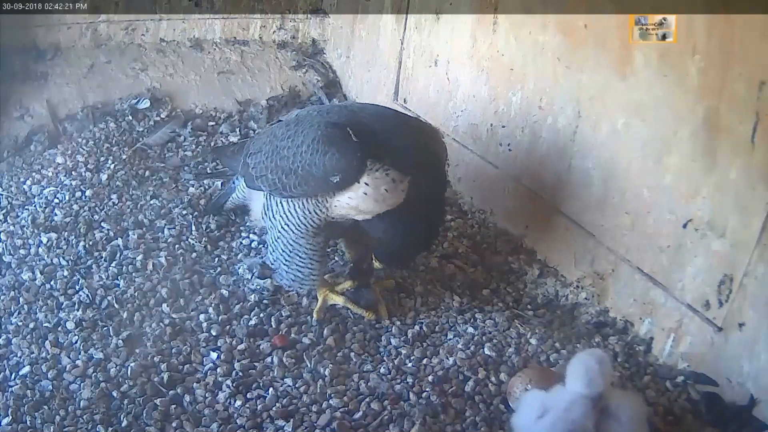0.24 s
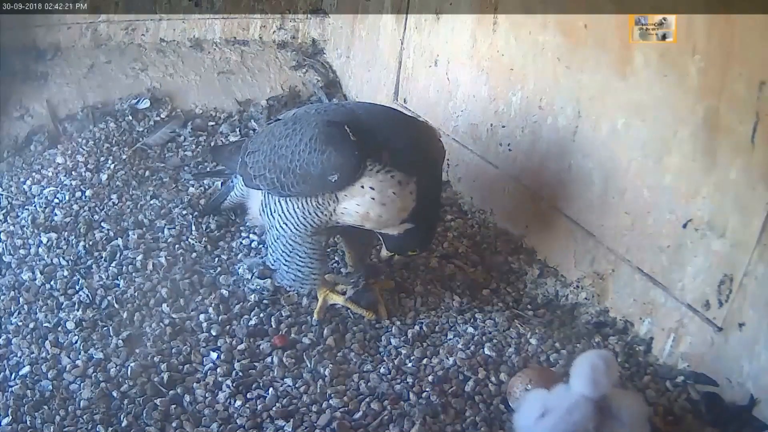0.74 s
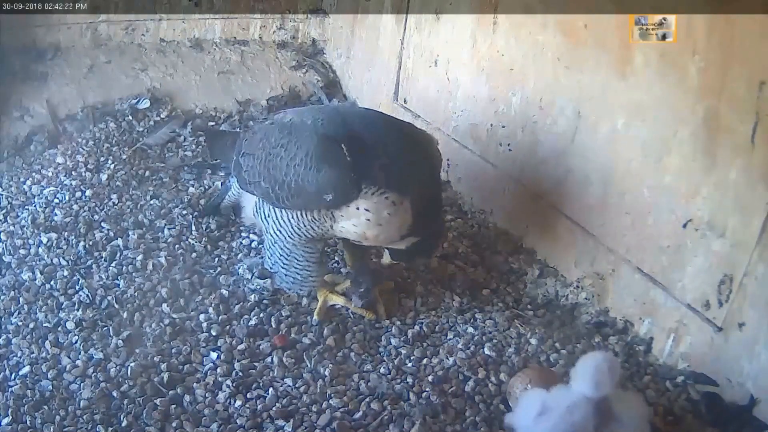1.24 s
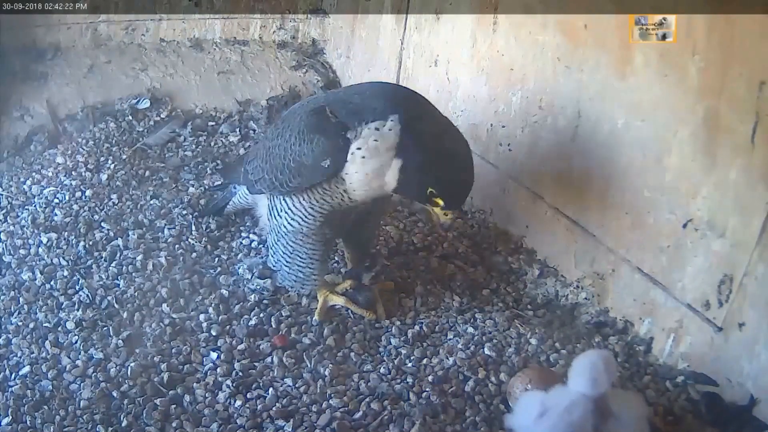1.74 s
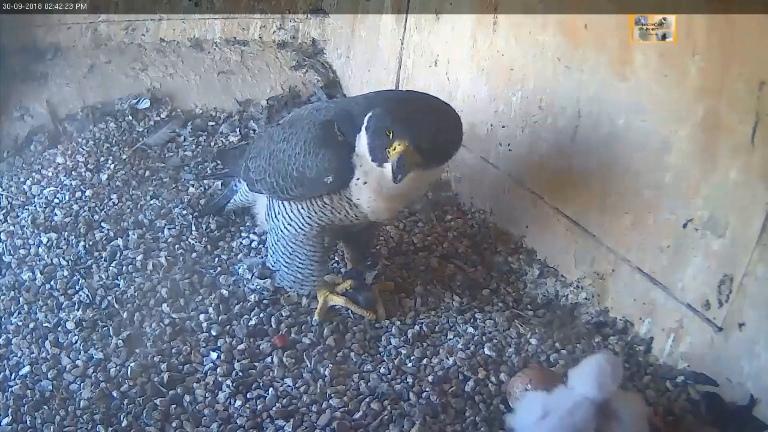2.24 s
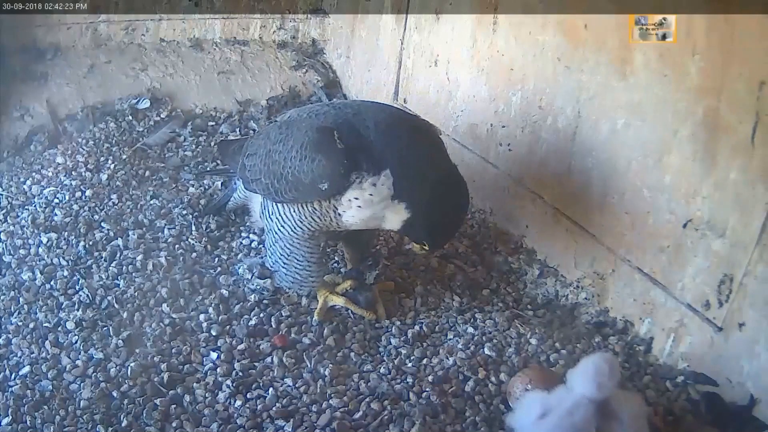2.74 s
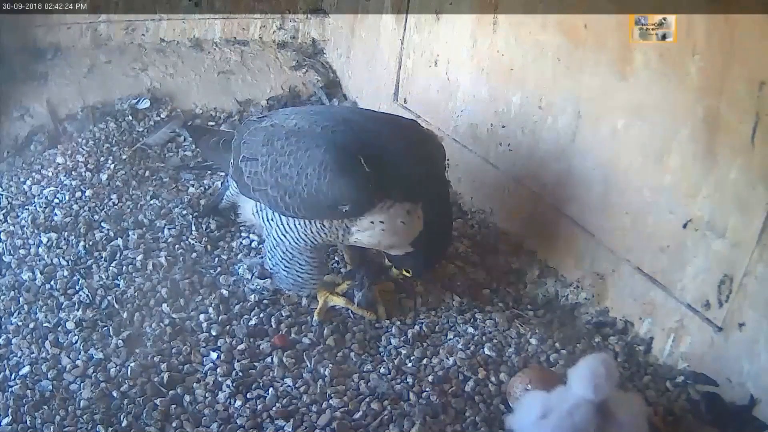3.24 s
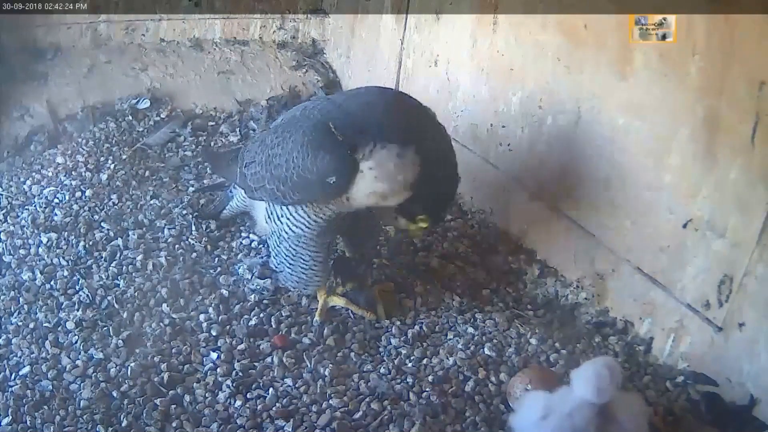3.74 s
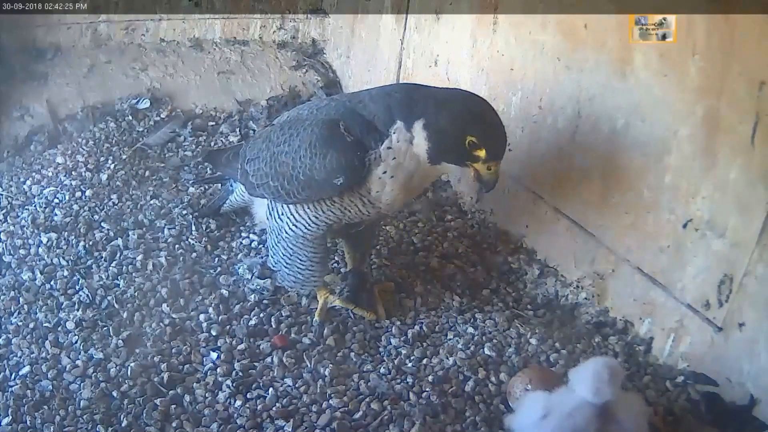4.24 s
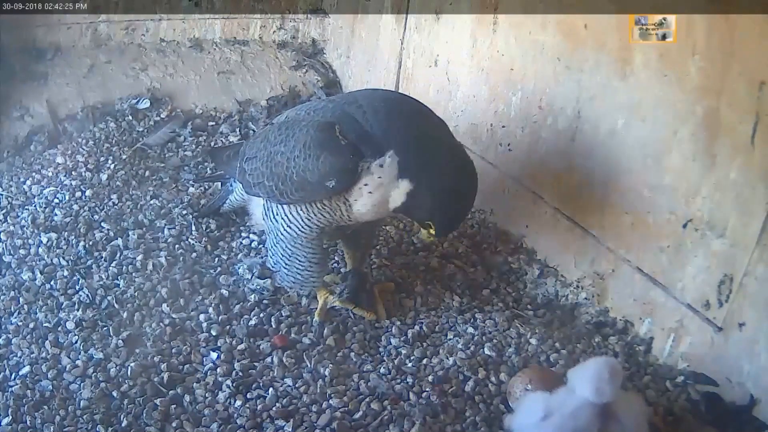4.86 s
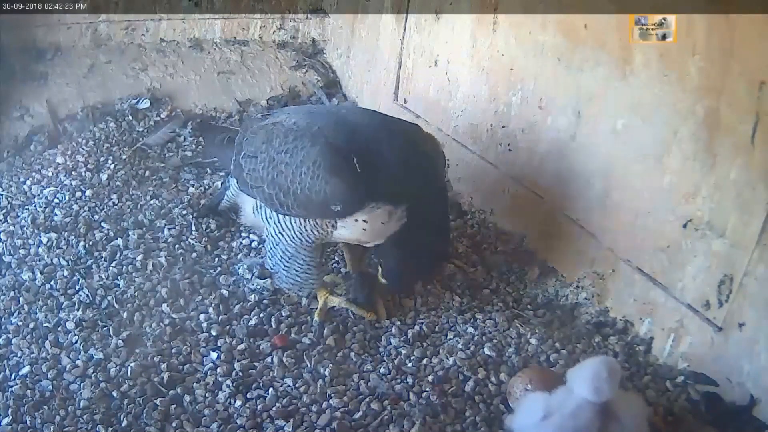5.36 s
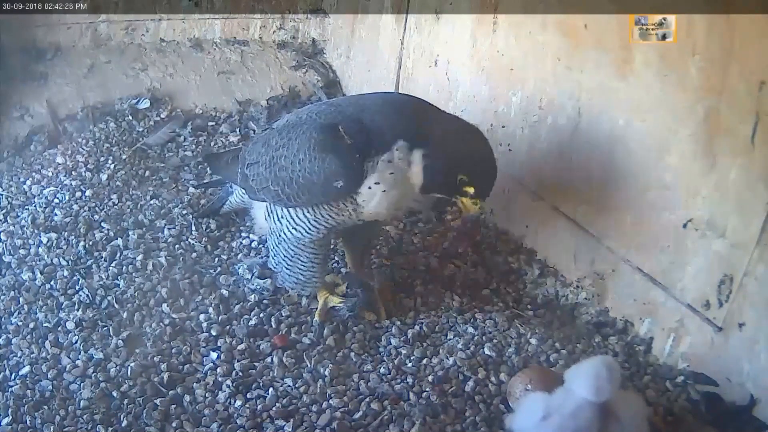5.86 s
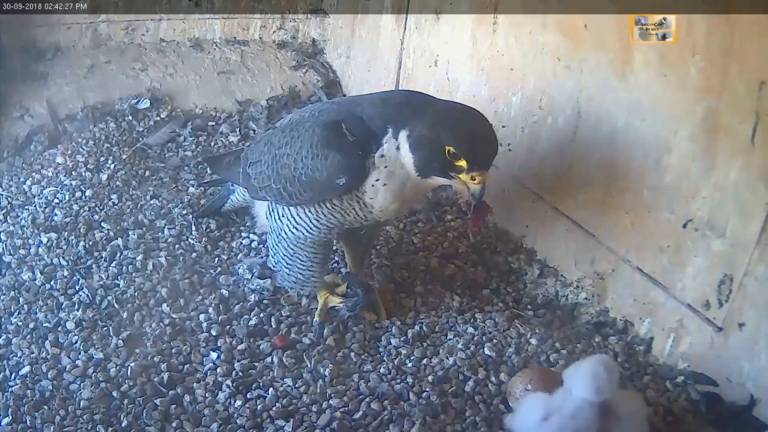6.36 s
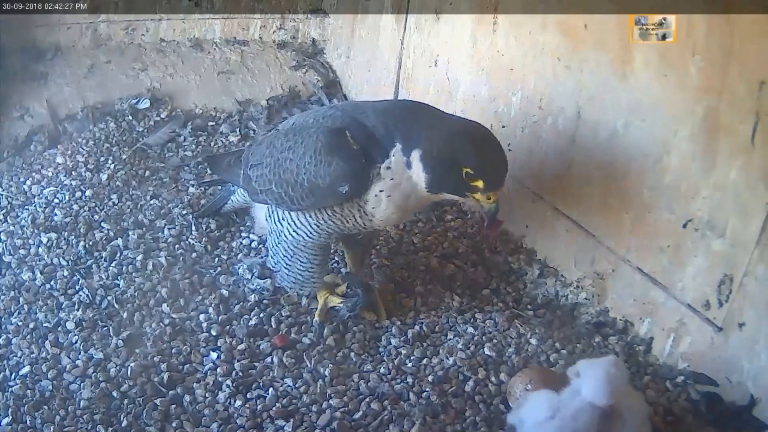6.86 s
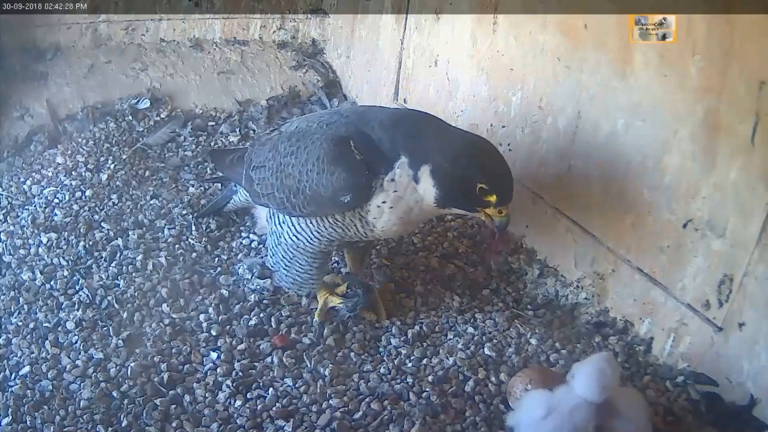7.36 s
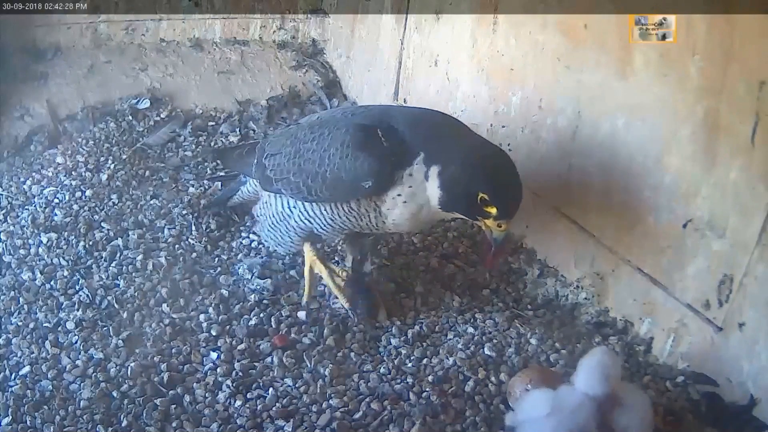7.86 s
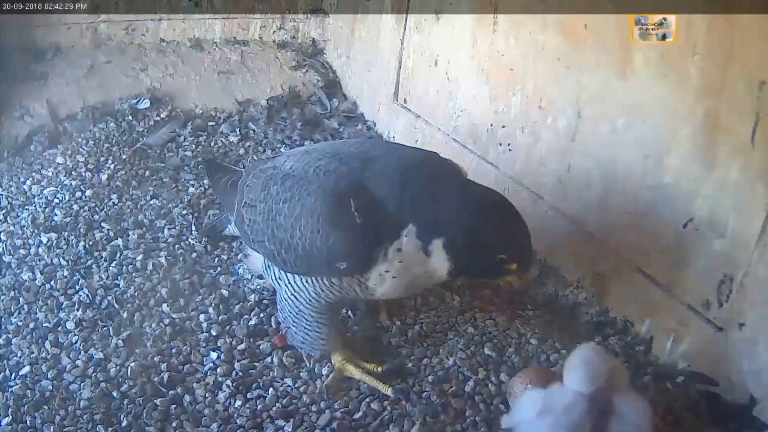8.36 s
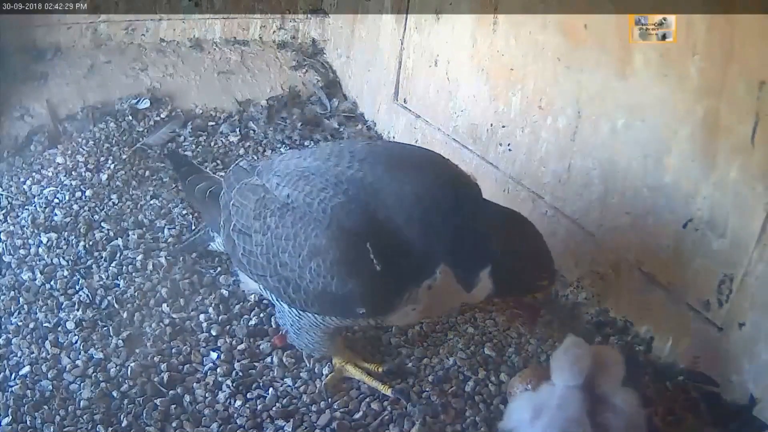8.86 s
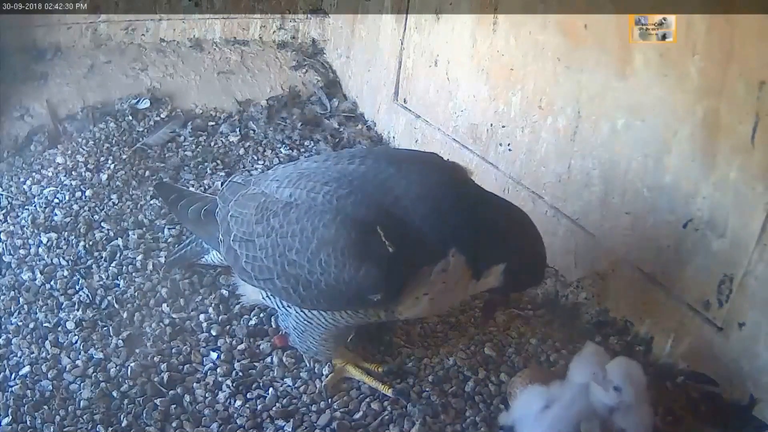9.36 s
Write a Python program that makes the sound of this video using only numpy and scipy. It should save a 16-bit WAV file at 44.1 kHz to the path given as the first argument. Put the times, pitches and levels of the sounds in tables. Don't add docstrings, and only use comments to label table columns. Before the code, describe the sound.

High, short chick peeps and hoarse squeals run throughout, over low wind rumble and gravel ticks, with three sharp, rattling parent clucks late on.

```python
import sys
import numpy as np
from scipy import signal
from scipy.fft import rfft, irfft
from scipy.io import wavfile
from scipy.ndimage import uniform_filter1d

SR = 44100
rng = np.random.default_rng(int(sys.argv[2]) if len(sys.argv) > 2 else 0)


def volts_from_decibels(level):
    exponent = np.asarray(level, float) / 20
    return 10 ** exponent


def materialize(psi):
    bounded = np.clip(np.atleast_2d(psi).T, -1, 1)
    quanta = np.round(bounded * 32767).astype(np.int16)
    wavfile.write(sys.argv[1], SR, quanta)


N = 423360
T = np.arange(N) / SR
TOP_HZ = 7500


def colour(x, points):
    hz, db = np.transpose(points)
    log_hz = np.log(np.arange(len(x) // 2 + 1) * SR / len(x) + 1)
    curve_db = np.interp(log_hz, np.log(hz), db, db[0] - 29.5, db[-1] - 38.5)
    return irfft(rfft(x) * volts_from_decibels(curve_db), len(x))


def ring(x, hz, width_hz):
    return signal.lfilter(*signal.iirpeak(hz, hz / width_hz, fs=SR), x)


def unit(x):
    return x / np.sqrt(np.mean(x ** 2))


def walk(rate_hz):
    k = max(int(SR / rate_hz), 1)
    once = uniform_filter1d(rng.standard_normal(N), k)
    return unit(uniform_filter1d(once, k))


def span(table):
    s, *columns = np.transpose(table)
    at = slice(int(s[0] * SR), int(s[-1] * SR))
    return at, [uniform_filter1d(np.interp(T[at], s, c), size=131) for c in columns]


def end_fades(n):
    i = np.arange(n)
    return np.clip(np.minimum(i, i[::-1]) / 88, 0, 1)


def knee(x, width):
    return width * np.logaddexp(0, x / width)


# (frequency [Hz], level [dB])
THROAT_RASP = [(1100, -18), (1700, -1), (2300, -22.5), (3000, -3), (4300, -7), (5600, -2.5), (6900, -10.5)]


def tone(table, wobble, overtones_db):
    at, (hz, db) = span(table)
    wobbling_hz = hz * (1 + wobble[at] * np.minimum(hz / 3000, 1) ** 2)
    phase = 2 * np.pi * np.cumsum(wobbling_hz) / SR
    wave = np.sin(phase)
    for partial, over_db in enumerate(overtones_db, 2):
        over_db = over_db + np.interp(partial * hz, *np.transpose(THROAT_RASP))
        wave = wave + volts_from_decibels(over_db) * (partial * hz < TOP_HZ) * np.sin(partial * phase)
    loud = volts_from_decibels(db) * end_fades(len(hz))
    return at, np.sqrt(2) * loud * wave, loud, hz


# (frequency [Hz], level [dB])
BEAK_COLOUR = [(1400, -0.5), (1800, 3.5), (2350, -7), (3000, 2), (3700, 0), (4600, -7), (5300, -3),
               (5900, 4)]
MID_HZ, BEND_HZ = 3000, 200


def cheep(s, rise_s, mid_s, top_hz, end_hz, hold_s, db, upper_db, stop_s, droop_hz, droop_s,
          perch_hz, perch_db, swell_s, fall_hz_s, settle_hz, fade_db_s, tail_s):
    from_hz = 3700 - 20000 * rise_s
    ease = max(2.1 - 27 * rise_s, .5)

    def to_climb(t):
        return np.clip(1 - t / rise_s, 0, 1) ** ease

    def track(t, hz, shape_db):
        attack_db = -6.5 * np.clip(1 - t / .0093, 0, 1)
        beak_db = np.interp(hz, *np.transpose(BEAK_COLOUR))
        return np.transpose([s + t, hz, db + shape_db + beak_db + attack_db])

    t = np.linspace(0, mid_s - stop_s, num=48)
    late = np.clip(1 - (t[-1] - t) / droop_s, 0, 1) ** 2
    arch_hz = top_hz - (top_hz - from_hz) * to_climb(t)
    upper = track(t, arch_hz - droop_hz * late, upper_db)

    t = np.linspace(0, mid_s + hold_s + tail_s, num=96)
    rest_hz = end_hz + settle_hz * np.exp(-np.maximum(t - mid_s, 0) / .018)
    slide_hz = rest_hz + knee(MID_HZ - rest_hz - fall_hz_s * (t - mid_s), BEND_HZ)
    climb_hz = perch_hz - (perch_hz - from_hz) * to_climb(t)
    swell_db = perch_db * np.clip((mid_s - t) / swell_s, 0, 1) ** 2
    fade_db = fade_db_s * np.maximum(t - mid_s - hold_s, 0)
    lower = track(t, climb_hz - knee(climb_hz - slide_hz, BEND_HZ), swell_db - fade_db)
    return upper, lower


# (time [s], rise [s], time to mid pitch of the fall [s], arch top [Hz], level [dB])
CLEAR_PEEPS = [(0.13, 0.029, .059, 5876, -35.5), (0.509, 0.031, 0.061, 5980, -32.5),
               (0.982, 0.023, 0.048, 5980, -33.5), (1.562, 0.011, 0.047, 5300, -35),
               (2.131, 0.023, 0.049, 5900, -34.5), (2.581, 0.045, 0.078, 5700, -36),
               (3.05, 0.021, 0.047, 5770, -34.5), (3.617, 0.017, 0.047, 5270, -34),
               (4.056, .014, 0.04, 5535, -36), (4.707, 0.03, 0.046, 5320, -37.5),
               (5.574, 0.025, .05, 4330, -38), (6.183, 0.021, 0.054, 5180, -35.5),
               (7.509, 0.046, 0.073, 5900, -45.5), (7.928, 0.029, 0.058, 6110, -42),
               (8.365, 0.018, 0.043, 5900, -42.5), (8.816, .026, 0.051, 5900, -37),
               (9.358, 0.029, .074, 6050, -36.5)]
# (time [s], time to mid pitch of the fall [s], last pitch [Hz], hold [s], level [dB])
QUICK_RISERS = [(0.818, 0.052, 1450, 0.039, -32.5), (2.887, 0.079, 1800, 0.029, -32.5),
                (3.967, 0.054, 1566, 0.022, -28.5), (4.584, 0.06, 1512, 0.034, -30.5),
                (5.172, 0.06, 1430, .045, -31), (8.745, 0.061, 1500, 0.032, -39.5),
                (9.441, .039, 1450, 0.042, -37.5)]
SLOW_RISERS = [(3.385, 0.079, 1660, 0.035, -30.5), (6.743, 0.076, 1640, 0.027, -44),
               (7.183, .108, 1730, 0.042, -42.5), (7.685, .092, 1533, 0.029, -40),
               (8.145, .077, 1450, 0.026, -39.5)]
# (time [s], pitch [Hz], level [dB])
STRAY_VOICES = [
    [(2.992, 1850, -41), (3.027, 3520, -39), (3.045, 3670, -36), (3.075, 2560, -42), (3.085, 1930, -37.5)],
    [(4.064, 1590, -32.5), (4.095, 2110, -46)],
    [(7.21, 2455, -54), (7.23, 3530, -41.5), (7.25, 4900, -74)],
    [(7.335, 2200, -48.5), (7.352, 2910, -54)],
    [(8.848, 1540, -40), (8.867, 1877, -48)],
    [(8.876, 1738, -48), (8.884, 1450, -40), (8.912, 1402, -77)],
    [(9.436, 1800, -33.5), (9.445, 1485, -32), (9.468, 1450, -49)],
]
LOWER_OVERTONES = [-5, -12, -13.5]
PEEP = dict(upper_db=-4, stop_s=.012, droop_hz=1000, droop_s=.016, perch_hz=4050, perch_db=-10,
            swell_s=.015, fall_hz_s=80000, settle_hz=60, fade_db_s=1050, tail_s=.024)
SQUEAL = dict(upper_db=-8.5, stop_s=.0066, droop_hz=800, droop_s=.018, perch_hz=4400, perch_db=-18,
              swell_s=.018, fall_hz_s=92400, settle_hz=472, fade_db_s=1094.5, tail_s=.036)


def chicks():
    out, shake, flutter = np.zeros(N), walk(640), walk(600)
    rasp = unit(colour(rng.standard_normal(N), THROAT_RASP)) * volts_from_decibels(1.4 * walk(200))

    cheeps = []
    for s, rise_s, mid_s, top_hz, db in CLEAR_PEEPS:
        hoarse = np.clip(.07 + .0015 * (5900 - top_hz), .07, .22)
        upper, lower = cheep(s, rise_s, mid_s, top_hz, 1800, .0033, db, **PEEP)
        cheeps.append((upper, lower, hoarse))
    for rise_s, rows in [(.02, QUICK_RISERS), (.043, SLOW_RISERS)]:
        for s, mid_s, end_hz, hold_s, db in rows:
            upper, lower = cheep(s, rise_s, mid_s, 5580, end_hz, hold_s, db, **SQUEAL)
            cheeps.append((upper, lower, .57))

    for upper, _, hoarse in cheeps:
        at, wave, loud, hz = tone(upper, .057 * hoarse * shake, [-16.])
        strain = hoarse * np.clip((hz - 4200) / 900, .15, 1)
        out[at] += wave * volts_from_decibels(5 * strain * flutter[at])
        out[at] += 1.7 * strain * loud * rasp[at]
    for lower in [c[1] for c in cheeps] + list(STRAY_VOICES):
        at, wave, loud, hz = tone(lower, .028 * shake[::-1], LOWER_OVERTONES)
        strain = np.minimum(hz / MID_HZ, 1) ** 2
        out[at] += wave * volts_from_decibels(3.98 * strain * flutter[::-1][at])
        out[at] += .23 * strain * loud * rasp[at]
    return out


# (time [s], pulse rate [Hz], level [dB])
CLUCK_PULSES = [
    [(6.344, 355, -22.5), (6.349, 369.4, -14), (6.366, 378.8, -21.5), (6.385, 394, -27),
     (6.415, 391, -49.5)],
    [(6.555, 370, -38), (6.565, 370, -44), (6.6, 380, -35)],
    [(6.603, 399.3, -22), (6.624, 393, -19), (6.634, 373, -22.5), (6.65, 338.6, -32.5), (6.672, 327, -49.5)],
    [(7.353, 344, -29), (7.362, 362, -15.5), (7.372, 371, -23), (7.385, 421, -25), (7.41, 384, -50.5)],
]
# (frequency [Hz], width [Hz], level [dB])
THROAT_MODES = [(919, 77, -10.5), (1450, 140, -4), (1850, 83, -2.5), (2120, 68, -6), (3000, 410, -7.5),
                (4940, 480, -25.5), (5700, 350, -13.5), (6640, 890, -18), (7400, 170, -29)]
# (time [s], pitch [Hz], level [dB])
CLUCK_WHISTLES = [
    [(6.386, 3140, -42), (6.397, 3000, -20.5), (6.403, 3000, -33)],
    [(6.558, 3990, -34), (6.568, 4100, -25), (6.59, 4560, -20.5), (6.599, 4690, -13.5),
     (6.605, 4400, -22.5)],
    [(6.603, 3000, -10), (6.606, 2950, -1), (6.613, 2760, -4), (6.617, 2900, -18), (6.623, 2930, -9),
     (6.627, 2900, -22)],
    [(6.613, 2050, -16), (6.62, 1920, -15), (6.628, 1850, -24), (6.645, 1560, -27), (6.665, 1400, -40)],
    [(6.557, 2020, -33), (6.563, 2180, -28), (6.585, 2280, -40.5)],
    [(7.386, 3350, -33), (7.394, 3320, -9.5), (7.402, 3080, -20), (7.408, 3110, -10), (7.413, 2820, -24),
     (7.424, 3140, -31)],
]


def parent():
    pulses, whistles, shake = np.zeros(N), np.zeros(N), walk(380)
    puff_cycles = .014
    for table in CLUCK_PULSES:
        at, (hz, db) = span(table)
        turns = np.cumsum(hz * (1 + .013 * shake[at])) / SR
        width = puff_cycles * volts_from_decibels(.36 * (db.max() - db))
        db = db + 2.5 * rng.standard_normal(64)[turns.astype(int)]
        puff = np.exp(-(turns % 1) / width) * np.sqrt(puff_cycles / width)
        breath = .04 * rng.standard_normal(len(hz))
        pulses[at] += volts_from_decibels(db) * end_fades(len(hz)) * (puff + breath)

    throat = np.zeros(N)
    for k, (hz, width_hz, db) in enumerate(THROAT_MODES):
        mode = ring(ring(pulses, hz, 2 * width_hz), hz, 2 * width_hz)
        throat += (-1) ** k * volts_from_decibels(db) * mode
    throat = signal.sosfilt(signal.butter(4, 6900, fs=SR, output="sos"), throat)

    for table in CLUCK_WHISTLES:
        at, wave, *_ = tone(table, .01 * shake, [-16.])
        whistles[at] += wave
    return volts_from_decibels(37) * throat + whistles


# (time [s], level [dB], frequency [Hz], ring [cycles])
BOX_THUMPS = [(1.683, -26, 230, 3), (3.677, -23, 110.6, 3.9), (3.68, -21.5, 277, 3.4),
              (3.753, -4, 39, 1.84), (5.741, -17, 41.4, 3.6), (5.762, -23, 148.4, 3.05),
              (6.344, -9, 315, 3.2), (6.375, -22.5, 341.7, 6.7), (6.558, -28, 322, 5),
              (6.604, -27, 397.3, 3.7), (6.642, -11.5, 294, 3), (7.354, -9, 319.7, 3), (7.386, -22, 357, 4),
              (7.872, -36, 288, 4.7)]
# (time [s], peak level [dB], frequency [Hz])
GRAVEL_TICKS = [(0.24, -50, 1090), (1.69, -32, 5800), (1.798, -38, 2950), (1.845, -49, 2900),
                (1.902, -39, 2920), (1.929, -43, 2860), (1.949, -45, 2900), (3.749, -23.5, 2940),
                (5.695, -47, 5800), (5.737, -40, 3000), (7.879, -57, 1250)]


def knocks():
    out, t = np.zeros(N), np.arange(SR // 2) / SR
    for s, db, hz, cycles in BOX_THUMPS:
        envelope = np.exp(-t * hz / cycles) * (1 - np.exp(-t * hz / .53))
        out[int(s * SR):][:len(t)] += volts_from_decibels(db) * np.sin(2 * np.pi * hz * t) * envelope
    for s, db, hz in GRAVEL_TICKS:
        crack = rng.standard_normal(len(t)) * np.exp(-t / .002)
        out[int(s * SR):][:len(t)] += volts_from_decibels(db) * (.57 * crack + 1.3 * ring(crack, hz, hz / 6))
    return out


# (time [s], boom level [dB])
WIND_BOOM = [(0.0, -20.5), (0.08, -38), (1.2, -30), (1.36, -44.5), (1.76, -27.5), (2.03, -40), (3.58, -39),
             (3.74, -24), (4.44, -42.5), (5.64, -41.5), (5.78, -22), (5.93, -41), (6.3, -38), (6.4, -55.5),
             (9.6, -54.5)]


def wind():
    boom_db = np.interp(T, *np.transpose(WIND_BOOM))
    boom = unit(ring(ring(rng.standard_normal(N), 39, 13), 48, 27))
    buffet_colour = [(55, -8), (75, 2.5), (120, -7.5), (165, -10.5), (210, -46)]
    buffet = unit(colour(rng.standard_normal(N), buffet_colour))
    buffet_db = -19 + .61 * boom_db + .9 * walk(7.5)
    return volts_from_decibels(boom_db) * boom + volts_from_decibels(buffet_db) * buffet


# (frequency [Hz], density [dB per Hz])
TOWN_AIR = [(88, -37.5), (150, -1), (224, -4.5), (335, 5), (363, -4.5), (462, -17), (880, -18.5),
            (984, -17.5), (2990, -30.5), (6670, -28), (7000, -21.5), (9100, -96), (15400, -120)]


def town():
    noise = colour(rng.standard_normal(N), TOWN_AIR)
    swell_db = .9 * walk(1)
    bands = np.zeros(N)
    for hz in 170 * 2 ** np.arange(0, 5.6, .5):
        bands += volts_from_decibels(swell_db + 1.4 * walk(21)) * ring(noise, hz, hz / 3)
    return volts_from_decibels(-48.5) * unit(bands)


def camera_whine():
    whine_hz, sag_hz_s, frame_hz, frame_start_s = 7266, 1.9, 29.97, .108
    frame, within = np.divmod((T - frame_start_s) * frame_hz + 10, 1)
    slip = .22 * rng.standard_normal(400)[frame.astype(int)]
    phase = 2 * np.pi * whine_hz * within / frame_hz + slip - np.pi * sag_hz_s * T ** 2
    dip = np.clip(np.minimum(within, 1 - within) / .047, 0, 1)
    return volts_from_decibels(-56 + 1.9 * (frame % 2)) * np.sin(phase) * dip


def box_modes(young):
    young = young + .53 * ring(young, 2937, 430) + 1.1 * ring(young, 3020, 90)
    wall_echo_s, wall_echo_db = .0065, -7
    return young + volts_from_decibels(wall_echo_db) * np.roll(young, int(wall_echo_s * SR))


def box_walls(young, old):
    t = np.arange(SR // 8) / SR
    walls = rng.standard_normal(len(t)) * np.exp(-np.log(1000) * t / .035)
    walls = walls - ring(walls, 3000, 900)
    return signal.fftconvolve(volts_from_decibels(-26) * young + volts_from_decibels(-39) * old, 2 * np.diff(walls))[:N]


# (frequency [Hz], level [dB])
OUTSIDE_COLOUR = [(600, -35), (1200, 5), (1500, -4.5), (2300, -11.5), (3000, -17), (3600, -4.5)]


def outside_echo(young, old):
    t = np.arange(SR * 2) / SR
    far = colour(rng.standard_normal(len(t)), OUTSIDE_COLOUR)
    far = far * np.exp(-np.log(1000) * t / 1.64) * np.clip(t / .037, 0, 1)
    return signal.fftconvolve(.75 * young + old, volts_from_decibels(-57) * far)[:N]


# (time [s], level [dB])
BACKGROUND_GAIN = [
    (0, 2),
    (6.344, 2),
    (6.36, -17),
    (6.6, 7.5),
    (6.62, -6),
    (7.35, -7),
    (7.37, -5),
    (9.6, -8),
]


def gain_control(x):
    return volts_from_decibels(np.interp(T, *np.transpose(BACKGROUND_GAIN))) * x


def scene():
    young, old = box_modes(chicks()), parent()
    birds = .48 * young + old + box_walls(young, old) + outside_echo(young, old)
    background = gain_control(town() + camera_whine())
    return (birds + knocks() + wind() + background)[None]


# (start [s], end [s], low edge [Hz], high edge [Hz])
TREBLE_GAPS = [(.388, .416, 3200, 4400), (.79, .81, 3300, 3600), (1.688, 1.72, 3600, 4300),
               (3.76, 3.855, 1900, 2750), (3.77, 3.855, 3550, 6900), (3.765, 3.79, 2750, 3550),
               (3.86, 3.96, 2300, 2650), (5.745, 5.815, 2600, 4900), (5.785, 5.815, 4900, 6700),
               (5.78, 5.83, 2000, 2600), (6.334, 6.345, 1700, 6900), (6.66, 6.672, 4200, 7450)]


def open_treble_gaps(x):
    for start_s, end_s, lo_hz, hi_hz in TREBLE_GAPS:
        at = slice(int(start_s * SR) - 2000, int(end_s * SR) + 2000)
        sos = signal.butter(6, [lo_hz, hi_hz], "band", fs=SR, output="sos")
        band = signal.sosfiltfilt(sos, x[0, at])
        gate = 1. * (T[at] > start_s) * (T[at] < end_s)
        x[0, at] -= band * uniform_filter1d(gate, size=130)
    return x


def roll_off(x):
    return signal.sosfilt(signal.butter(12, 15590, fs=SR, output="sos"), x)


def record(dry):
    x = signal.sosfilt(signal.ellip(8, .3, 80, TOP_HZ, fs=SR, output="sos"), dry)
    mix = np.clip(open_treble_gaps(x), -1, 1)
    return roll_off(mix)


dry = scene()
out = record(dry)
materialize(out)
```